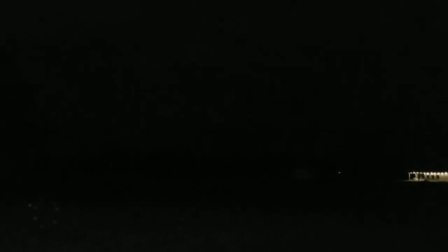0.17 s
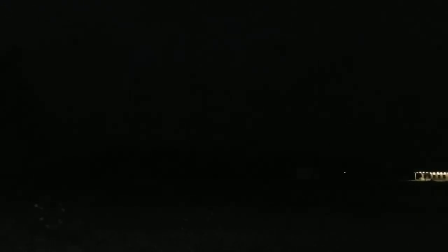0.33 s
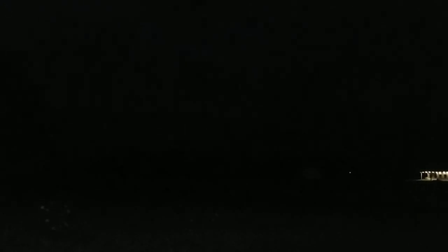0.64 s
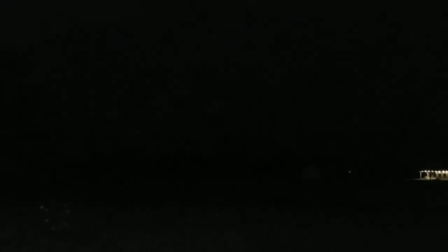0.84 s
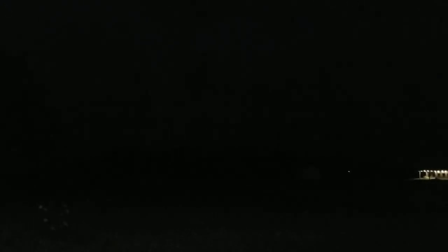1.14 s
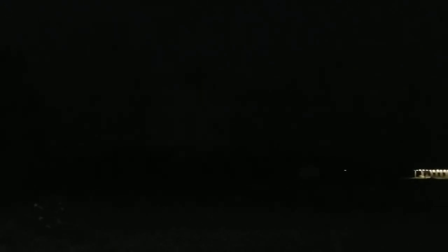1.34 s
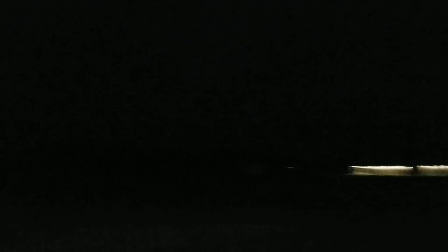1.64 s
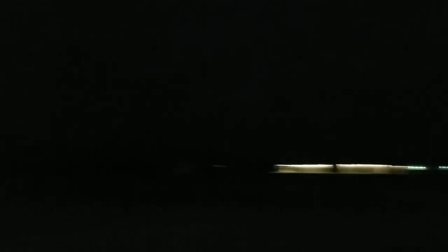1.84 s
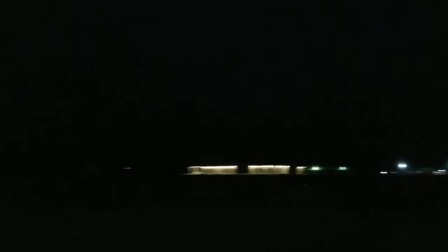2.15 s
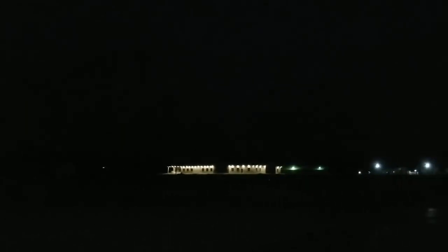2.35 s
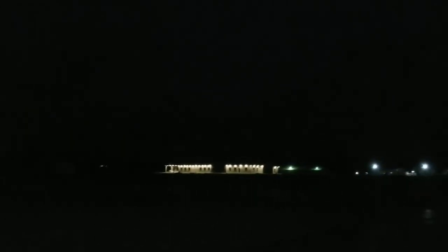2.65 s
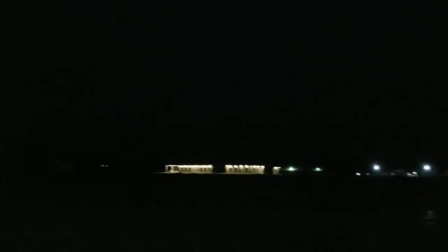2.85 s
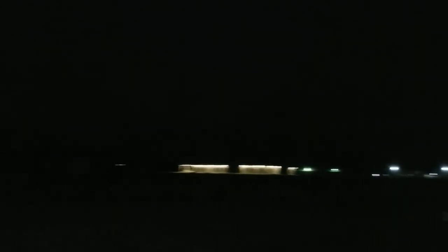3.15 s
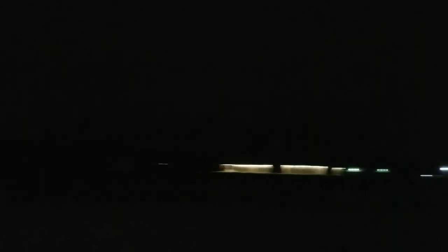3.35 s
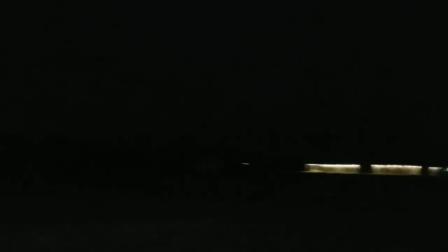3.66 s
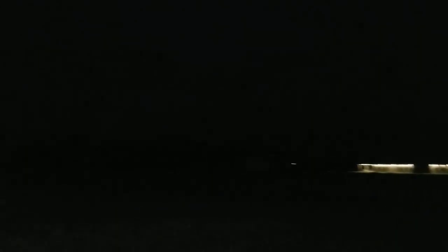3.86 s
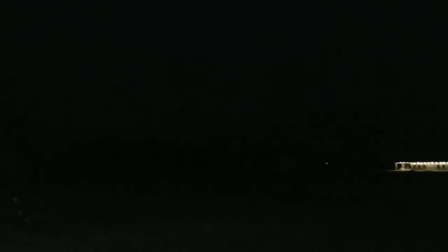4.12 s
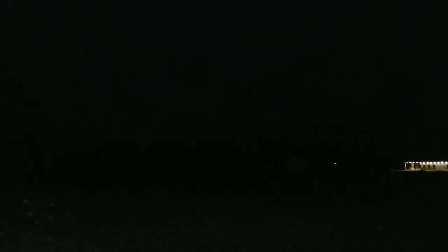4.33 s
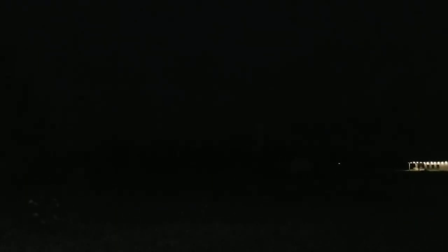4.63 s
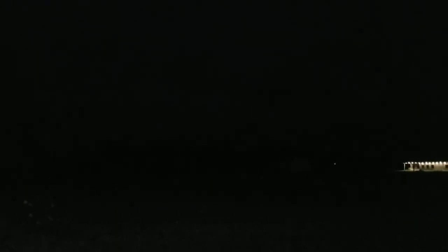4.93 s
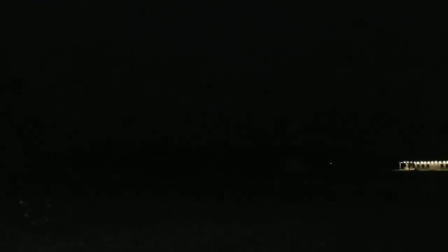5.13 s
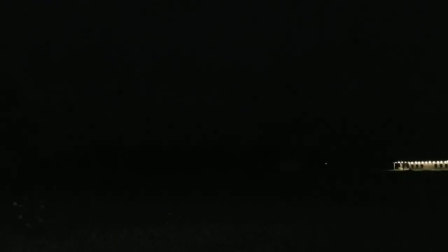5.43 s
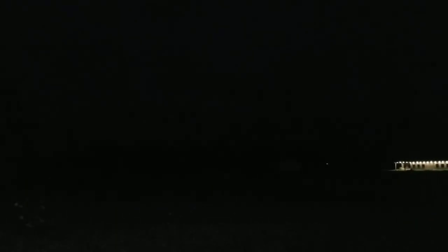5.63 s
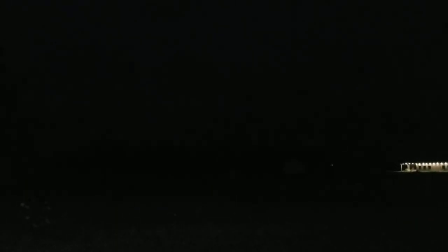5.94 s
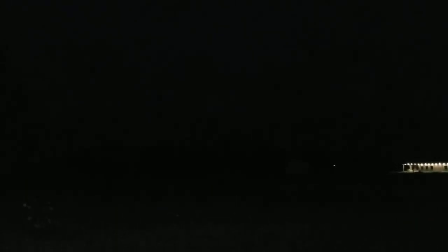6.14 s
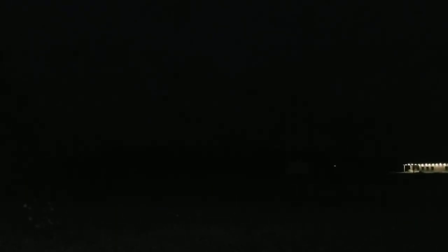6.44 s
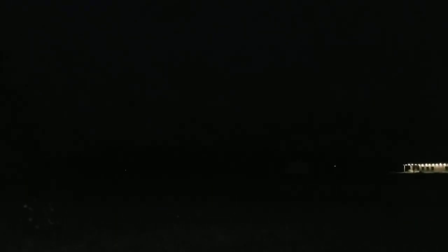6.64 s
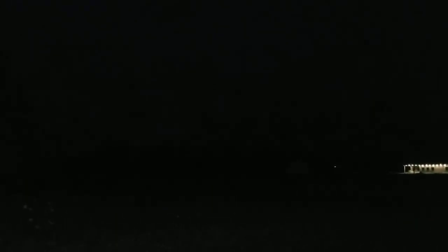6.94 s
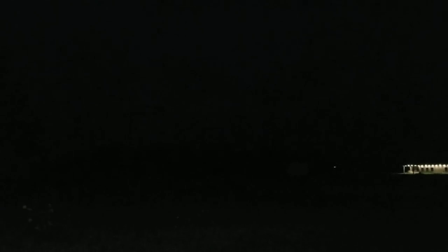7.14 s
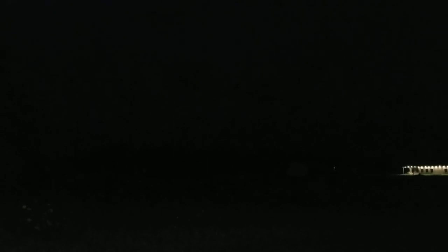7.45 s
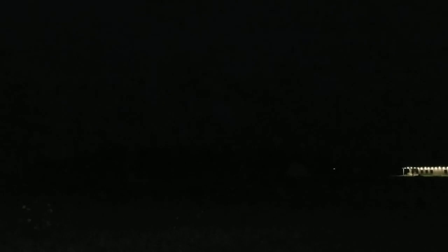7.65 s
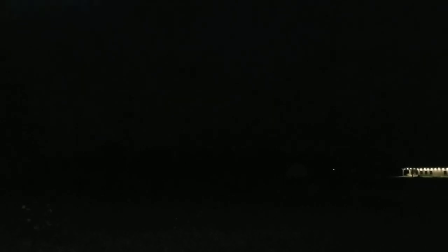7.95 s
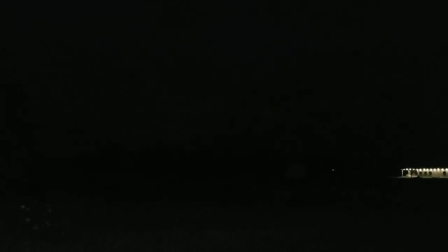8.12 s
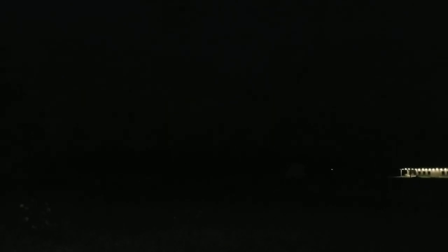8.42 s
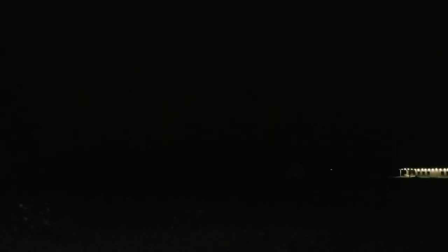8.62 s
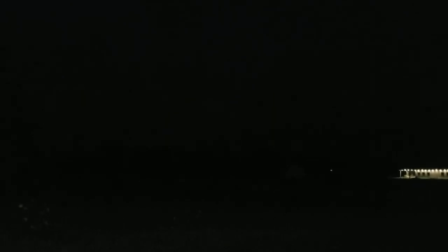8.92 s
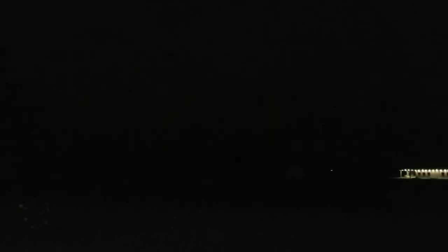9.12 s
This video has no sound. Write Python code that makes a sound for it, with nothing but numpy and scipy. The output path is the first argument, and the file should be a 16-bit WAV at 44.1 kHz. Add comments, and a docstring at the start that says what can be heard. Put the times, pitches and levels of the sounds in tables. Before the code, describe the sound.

Open field at night, heard in stereo on a hand-held recorder. A high, dry katydid buzz is already sounding and stops at 0.8 s, its echo quickly dying in the grass. Tree crickets hold a steady shimmer near 3 kHz with finer insect hiss above; a small cricket chirps on the left about every 0.4 s. Two low croaks overlap at 1.1 s. A short rasping lead-in at 1.5 s brings the chorus, joined by a louder, nearer katydid from 2 to 3.2 s; a faint toad trills at 2.4 s. Another lead-in at 4 s starts a buzz until 5.5 s, then a toad trill. The next phrase runs 6.3-7.8 s, with a soft distant boom at 7.0. In the pause, faint ticking grows from 7.9 to 8.6 s and one sharp tap knocks the left at 8.05. The buzz returns at 8.6 and continues, with another toad trill at 8.75. Low traffic rumble, blurred frogs and night air persist.

```python
"""Katydids on the right buzz in phrases timed together, one leading in, in an open field at night.
Each buzz is noise and sharp impulses, one stroke after another, coloured by the wings and echoed by plants.
Tone pulses make the tree crickets, far insects and a chirping cricket; shaped noise makes frogs, air and traffic.
A toad's trills ring a throat sac, other calls croak, two faint tones waver and a soft thud booms far off.
An insect ticks in noise bursts in the last pause, and one tap knocks the left port of the hand-held recorder."""
import sys
import numpy as np
from scipy import signal
from scipy.fft import rfft, irfft, next_fast_len
from scipy.io import wavfile
from scipy.ndimage import uniform_filter1d, map_coordinates

SR = 44100
rng = np.random.default_rng(int(sys.argv[2]) if len(sys.argv) > 2 else 0)


def pcm_store(signal):
    """Save signal as 16-bit PCM."""
    levels = np.round(np.clip(np.atleast_2d(signal), -1, 1) * 32767)
    wavfile.write(sys.argv[1], SR, levels.astype(np.int16).T)


N = 409248
T = np.arange(N) / SR  # time of each sample, s

# Katydid phrases, two lists each: (start t/s, attack t/s, end t/s), then
# (level/dB after the attack, level/dB at the end), both before echoes and port colouring.
BRIGHT_PHRASES = ([(-.1, .05, .785), (1.615, .04, 3.178), (4.04, .06, 5.537), (6.277, .04, 7.8),
                  (8.575, .03, 9.4)], [(-37, -37.5), (-38, -42), (-36.5, -36.5), (-37, -36),
                  (-37.5, -35.5)])
MELLOW_PHRASES = ([(-.1, .05, .785), (1.62, .07, 2.03), (4.06, .14, 5.53), (6.295, .08, 7.8),
                  (8.595, .045, 9.4)], [(-37, -38.5), (-42, -33), (-40, -39), (-39, -40), (-40.5, -41)])
# The mellow katydid, heard more directly with the recorder facing it, sings one phrase.
FACING_PHRASES = ([(1.96, .28, 3.178)], [(-30.5, -35.5)])
# The leader gives two short lead-ins, each before the others join.
LEADER_PHRASES = ([(1.526, .014, 1.63), (3.958, .008, 4.11)], [(-47.5, -46), (-49, -46)])
# When the phrases end, used to slow the wing strokes: t/s
PHRASE_ENDS = [.8, 3.19, 5.54, 7.81, 10.1]
# Wing colour of each katydid: f/Hz, relative level/dB per Hz
BRIGHT_WING = [(4000, -55), (7000, -34.5), (8000, -8), (9000, 0.5), (10500, 3), (11900, -1), (12500, -1),
               (13200, -7), (14000, -7), (15000, -13), (15600, -10.5), (15900, -7)]
MELLOW_WING = [(4120, -77), (7000, -29.5), (7500, -22), (8030, -18.5), (9420, 2.5), (9920, -3.5),
               (11300, -13.5), (12400, -30), (13500, -48)]
FACING_WING = [(4100, -58), (7000, -25), (7600, -6.5), (8300, -6), (8800, -0.5), (9500, 3), (10000, 3),
               (10600, -3), (11300, -4), (11900, -5), (12400, -17), (13000, -18), (13700, -29), (15700, -30)]
LEADER_WING = [(8000, -40), (9300, -6), (10000, -10), (10800, -6), (11400, -10), (12000, 4), (12600, -12),
               (14000, -16), (15700, -25)]
# When each pitch sounds within a stroke, as the scraper slows along the toothed file: f/Hz, delay/ms
STROKE_SWEEP = [(7000, 3.4), (7500, 3), (9000, 1.6), (10500, .3), (12000, 0), (16000, 1.5)]
# Sound paths off leaves and ground, one list for the left port and one for the right: delay/ms, gain
HEDGE_PATHS = ([(.27, .6), (2.46, .12), (3.46, .12)], [(0, 1), (.843, .25), (1.167, .22), (1.484, -.42),
               (1.863, .2), (2.487, .15)])
CLEARING_PATHS = ([(.28, .6), (.74, .5), (1.36, .2), (1.65, .2)], [(0, 1), (1.082, 0.11), (1.441, .17),
                  (2.192, 0.36), (2.673, 0.23)])
# How the recorder's body colours the left port: f/Hz, level/dB
BODY_SHADOW = [(7000, 3), (9500, -3.5), (11500, -2), (13000, -24), (16000, 4.5)]
# The same for the mellow katydid's direct sound, with the recorder facing it: f/Hz, level/dB
FACING_SHADOW = [(7000, -2), (7700, 3), (8300, -2.5), (9300, -17), (10200, -8), (10900, 1.5), (11800, -4),
                 (12400, -5), (13000, 6), (13600, -5), (16000, -9)]
# Tree crickets and far insects: centre f/Hz, spread f/Hz, mean pulses per s, pulse length/ms,
# level/dB before swells and drift, left over right/dB
CHORUSES = [(3132, 96.5, 1600, 15.4, -50, 2.5), (5800, 293, 3000, 6.1, -56, -0.5),
            (7916, 350, 2500, 4, -59, -2.5), (9990, 600, 1700, 3.2, -62, -8)]
# Slow swell of the tree crickets: t/s, added level/dB
TREE_CRICKET_SWELL = [(0, 0.5), (1.9, .5), (2.75, 4), (3.15, 0.5), (7.3, 0), (8.2, 1.5), (9.28, 1)]
# Colours of traffic, frogs, and night air with far insects: f/Hz, relative level/dB per Hz
RUMBLE_COLOUR = [(8.8, -35), (15, -38), (44, -3.5), (65, 5.5), (81, -2), (120, -6), (156, -14.5),
                 (300, -24.5), (390, -43), (660, -120)]
FROG_COLOUR = [(1600, -27.5), (1900, -3), (2250, -2.5), (2600, -2), (2900, -22)]
AIR_COLOUR = [(120, -2.5), (300, -8), (500, -12.5), (800, -7), (1100, -11.5), (1550, -17), (2500, -7.5),
              (3600, -17), (4600, -10.5), (6800, -11.5), (8800, -17.5), (11500, -14.5), (13200, -21.5),
              (16000, -44)]
# Loudness of the traffic and of the frog chorus: t/s, level/dB
RUMBLE_LEVEL = [(0, -52), (1.9, -49), (2.5, -52), (3.9, -51.5), (4.2, -57.5), (4.8, -53), (5.6, -55),
                (5.85, -49), (6.5, -50), (6.9, -48), (7.4, -50), (7.75, -54), (8.05, -49.5), (8.75, -55),
                (9, -49), (9.28, -51.5)]
FROG_LEVEL = [(0.0, -61.5), (1.11, -64), (1.27, -57), (1.96, -65.5), (2.35, -61.5), (3.93, -68.5),
              (4.44, -64), (4.99, -64), (5.22, -58.5), (6.54, -66), (6.9, -58), (7.68, -67.5),
              (8.19, -60.5), (9.28, -67.5)]
# How alike the two sides of the noise are: f/Hz, likeness (1 same, -1 opposite)
PORT_LIKENESS = [(60, 0.99), (150, 0.92), (380, 0.54), (950, -0.6), (2380, 0.41), (5980, -0.13),
                 (15000, 0.17)]
# Faint tones: centre f/Hz, middle level/dB
FAINT_TONES = [(372, -74.5), (581, -79.5)]
# When the small cricket on the left chirps: t/s
CHIRP_TIMES = [.16, .72, 1.16, 1.569, 2.021, 2.43, 2.85, 3.25, 3.66, 4.07, 4.51, 4.91, 5.31, 5.692, 6.1,
               6.51, 6.91, 7.32, 7.71, 8.09, 8.52, 8.93]
# Toad trills: start t/s, end t/s, first pulses per s, last pulses per s, relative level/dB
TOAD_TRILLS = [(2.345, 2.9, 27, 24, -68.5), (5.447, 6.02, 27.2, 23.6, -63), (8.75, 9.4, 27.2, 23.6, -63)]
# Resonances of the toad's throat sac: f/Hz, relative level/dB, time to fall 60 dB t/s
THROAT_SAC = [(1122, -16, .035), (1154, 3, 0.047), (2285, 5, 0.035)]
# Short low calls: start t/s, length t/s, f/Hz, middle level/dB at the right port
CROAKS = [(1.06, 0.084, 1040, -58), (1.1, 0.098, 1910, -52.5)]
# The ticking insect: start t/s, end t/s, ticks per s
TICKING = (7.89, 8.6, 48)
# Its wing colour: f/Hz, relative level/dB per Hz
TICK_WING = [(8500, -30), (10300, -1), (12000, 0), (14000, -3), (15800, -22)]
# The tap: t/s, level/dB
TAP = (8.0547, -18.5)
# Resonances of the recorder's shell: f/Hz, level/dB relative to the tap, time to fall 60 dB t/s
SHELL = [(880, -6.5, 0.01), (453, -13, 0.016)]

STOP_S = .02  # time the wings take to come to rest
CHIRP_DB = -52
THUD_S, THUD_HZ, THUD_DB, THUD_T60_S = 7.035, 72, -31.5, 0.55  # T60: time to fall 60 dB
TICK_DB = -59.5
TICK_DEPTH, RETURN_DEPTH = 0.72, .7  # how strongly the main and the doubled beat shape the ticks
TOP_HZ = 15830  # the recorder's band limit


def amp(db):
    """Turn dB into a gain."""
    return 10 ** (np.asarray(db) / 20)


def unit(x):
    """Scale a sound to an rms level of 1."""
    return x / np.sqrt(np.mean(x ** 2) + 1e-20)


def along(points, hz):
    """Read a curve of (Hz, value) points, joined by straight lines on a log pitch scale."""
    f, value = np.transpose(points)
    return np.interp(np.log(hz + 1), np.log(f + 1), value)


def curves(rows):
    """Draw each column after the time as a curve with one value per sample."""
    s, *columns = np.transpose(rows)
    return [np.interp(T, s, column) for column in columns]


def wobble(rate):
    """Draw a smooth random curve through `rate` random points a second."""
    return map_coordinates(rng.standard_normal(int(N * rate / SR) + 4), [T * rate])


def filtered(x, response):
    """Change the strength and timing of each frequency in a sound."""
    size = next_fast_len(N + 8192)
    spectrum = rfft(x, size) * response(np.fft.rfftfreq(size, 1 / SR))
    return irfft(spectrum, size)[..., :N]


def rush(colour, patchy_db):
    """Make coloured stereo noise of rms 1 whose loudness varies in random patches of time and pitch."""
    z = signal.stft(rng.standard_normal((2, N)), nperseg=512)[2]
    patches = uniform_filter1d(rng.standard_normal(z.shape[1:]), size=5, axis=0)
    patches = uniform_filter1d(patches, size=12, axis=1)
    pair = signal.istft(z * amp(patchy_db * unit(patches)), nperseg=512)[1][:, :N]

    def middle_and_side(hz):
        # more side sound makes the ports less alike
        turn = np.arccos(np.clip(along(PORT_LIKENESS, hz), -1, 1)) / 2
        return amp(along(colour, hz)) * [np.cos(turn), np.sin(turn)]

    middle, side = filtered(pair, middle_and_side)
    return unit(np.array([middle + side, middle - side]))


def ring(modes, size):
    """Add up the fading tones that one blow sets ringing."""
    t = T[:size]
    return sum(amp(db - 60 * t / t60) * np.sin(2 * np.pi * hz * t) for hz, db, t60 in modes)


def pulses(at_s, hz, ms, gain):
    """Place short soft tone pulses, each falling a little in pitch."""
    size = int(ms * SR / 1000)
    u = np.arange(size) / size  # 0 to 1 through the pulse
    cycles = hz[:, None] * (1 - 0.011 * u) * u * ms / 1000
    wave = np.sin(np.pi * u) * np.sin(2 * np.pi * cycles)
    index = (at_s[:, None] * SR).astype(int) + np.arange(size)
    return np.bincount(index.ravel(), (gain[:, None] * wave).ravel(), N + SR)[:N]


def phrasing(phrases, stop_db, fall_db_per_s):
    """Each phrase swells in, drifts to its last level, drops as the wings stop and echoes away."""
    effort = np.zeros(N)
    for (start, attack, end), (first_db, last_db) in zip(*phrases):
        times = [start + attack, end, end + STOP_S]
        level_db = np.interp(T, times, [first_db, last_db, last_db - stop_db])
        echo_fall_db = fall_db_per_s * np.clip(T - end, 0, 1)
        effort += np.clip((T - start) / attack, 0, 1) * amp(level_db - echo_fall_db)
    return effort


def katydid(effort, wing, strokes, depth, clean, paths, shadow, grass_db, grass_s):
    """A scraper rasps over a toothed file once per wing stroke; leaves, ground and grass return the buzz."""
    # strokes per second slow from the first rate to the second as each phrase tires
    to_end = np.array(PHRASE_ENDS)[np.searchsorted(PHRASE_ENDS, T - .3)] - T
    rate = np.interp(to_end, [0, 1.6], strokes[::-1])
    beat = np.cumsum(rate) / SR
    stroke = np.exp(depth * np.cos(2 * np.pi * beat) + 0.017 * wobble(60))

    # an even run over the teeth is one impulse a stroke, a little early or late and uneven in size
    at = np.flatnonzero(np.diff(np.floor(beat)))
    early, size = rng.standard_normal((2, 2000))[:, :len(at)]
    places = np.clip(at + np.round(0.7 * early).astype(int), 0, N - 1)
    runs = np.bincount(places, amp(0.5 * size), N)

    # the first noise is the rasp, with `clean` as the share of even runs; the others feed the grass echoes
    rasp = rng.standard_normal((3, N))
    rasp[0] = np.sqrt(1 - clean) * unit(stroke * rasp[0]) + np.sqrt(clean) * unit(runs)

    def wing_response(hz):
        # delays are shortest at 12 kHz, so pitch glides down below it and up above it
        turns = np.cumsum(along(STROKE_SWEEP, hz)) * hz[1] / 1000
        return amp(along(wing, hz)) * np.exp(-2j * np.pi * turns)

    buzz = filtered(rasp, wing_response)
    buzz /= buzz.std(axis=1, keepdims=True)

    def arrive(port, hz):
        return sum(gain * np.exp(-2j * np.pi * hz * ms / 1000) for ms, gain in port)

    direct = filtered(effort * buzz[0], lambda hz: np.array([arrive(port, hz) for port in paths]))
    # still stems nearby add a fine fixed pattern of short echoes, 16 dB down
    stems = rng.standard_normal((2, 512)) * amp(-60 * T[:512] / 0.013)
    stems *= amp(-16.0) / np.linalg.norm(stems, axis=1, keepdims=True)
    direct += signal.fftconvolve(direct, stems, axes=1)[:, :N]

    # swaying grass blurs the strokes, differs at the two ports and lingers
    step = 1 / (grass_s * SR)
    linger = signal.lfilter([step], [1, step - 1], effort ** 2)
    both = direct + amp(grass_db)[:, None] * np.sqrt(np.abs(linger)) * buzz[1:]
    return filtered(both, lambda hz: np.array([amp(along(shadow, hz)), 1 + 0 * hz]))


def choruses():
    """So many far trillers of each kind sound at once that their pulses merge into a shimmer."""
    out = np.zeros((2, N))
    swell_db, = curves(TREE_CRICKET_SWELL)
    for hz, spread_hz, rate, ms, db, pan_db in CHORUSES:
        gap, side = rng.random((2, 32000))
        tune, size = rng.standard_normal((2, 32000))
        at = np.cumsum(2 * gap / rate)
        keep = at < N / SR
        at, side = at[keep], side[keep]
        pitch = hz + spread_hz * np.clip(tune[keep], -2, 2)
        gain = amp(1.16 * size[keep])
        # pulses stronger on the left also start later there, by up to 1 ms
        left = unit(pulses(at + .001 * side, pitch, ms, gain * side))
        right = unit(pulses(at, pitch, ms, gain * (1 - side)))
        drift_db = swell_db * (hz < 4000) + .4 * wobble(5)  # only the lowest chorus, the tree crickets, swells
        out += amp(db + drift_db) * amp([[pan_db / 2], [-pan_db / 2]]) * np.array([left, right])
    return out


def distance():
    """Noise makes traffic rumble, a blurred frog chorus and night air; sines make two wavering tones."""
    (rumble_db,), (frogs_db,) = curves(RUMBLE_LEVEL), curves(FROG_LEVEL)
    rumble = amp(rumble_db) * rush(RUMBLE_COLOUR, patchy_db=0.5)
    # the frogs are 2 dB louder at the left port
    frogs = amp(frogs_db) * amp(0) * np.array([[1], [-1]]) * rush(FROG_COLOUR, patchy_db=1.5)
    frogs *= amp([[1], [-1]]) * [[1], [-1]]
    tones = np.zeros(N)
    for hz, db in FAINT_TONES:
        level = amp(db + 4 * wobble(3))
        tones += level * np.sin(2 * np.pi * np.cumsum(hz + 1.5 * wobble(6)) / SR)
    return rumble + frogs + tones + amp(-55) * rush(AIR_COLOUR, patchy_db=2.5)


def cricket(count=9):
    """Each chirp is a run of quick pulses that rise in pitch at first, louder on the left."""
    k = np.tile(np.arange(count), len(CHIRP_TIMES))  # place of each pulse in its chirp
    hz = 7540 - 200 * np.exp(-k / 0.78) + 30 * rng.standard_normal(len(k))
    at = np.repeat(CHIRP_TIMES, count) + .0115 * k
    chirps = pulses(at, hz, 9, amp(CHIRP_DB + 1.5 * rng.standard_normal(len(k))))
    return chirps * amp([[0], [-9]])


def toad():
    """Vocal pulses slowing through each trill ring the throat sac; short croaks are rough tones."""
    puffs, croaks = np.zeros(N), np.zeros(N)
    for start, end, first, last, db in TOAD_TRILLS:
        rate = np.interp(T, [start, end], [first, last]) * (T >= start) * (T < end)
        beat = np.cumsum(rate) / SR
        at = np.flatnonzero(np.diff(np.floor(beat + .99), prepend=0))
        puffs[at] = amp(db + 18 + 1.6 * rng.standard_normal(40)[:len(at)])
    voice = ring(THROAT_SAC, size=2200) * (1 - np.exp(-(T[:2200] / 0.0069) ** 2))  # soft start
    for s, length, hz, db in CROAKS:
        shape = np.sin(np.pi * np.clip((T - s) / length, 0, 1))
        croaks += amp(db + 2 * wobble(82.5)) * shape * np.sin(2 * np.pi * hz * T)
    calls = signal.fftconvolve(puffs, voice)[:N] + croaks
    # the left port hears it 14 samples later and softer
    return np.array([amp(-4.5) * np.roll(calls, 14), calls])


def thud():
    """A far soft boom is one low tone that swells quickly and fades, alike at both ports."""
    t = np.clip(T - THUD_S, 0, None)
    rise = 1 - np.exp(-t / 0.0098)
    return amp(THUD_DB - 60 * t / THUD_T60_S) * rise * np.sin(2 * np.pi * THUD_HZ * t)


def ticker():
    """Short even bursts of wing noise creep in, louder on the right."""
    start, end, rate = TICKING
    beat = 2 * np.pi * rate * (T - start)
    # the wings also sound on the way back
    gate = np.exp(TICK_DEPTH * np.cos(beat) + RETURN_DEPTH * np.cos(2 * beat))
    noise = gate * rng.standard_normal((2, N))
    bursts = unit(filtered(noise, lambda hz: amp(along(TICK_WING, hz))))
    fade_in = np.clip((T - start) / .15, 0, 1)
    return amp(TICK_DB) * fade_in * (T < end) * bursts * amp([[-5], [0]])


def tap():
    """One knock by the left port gives a brief tick in the port's cavity, then the shell rings low."""
    at_s, db = TAP
    out = np.exp(-((T - at_s) / 0.00039) ** 2) * np.cos(2 * np.pi * 2800 * (T - at_s))
    shell = ring(SHELL, size=800) * (1 - np.exp(-T[:800] / .001))
    out[round(at_s * SR) + 22:][:800] -= shell
    return amp(db) * out * amp([[0], [-24]])


def scene():
    """Add up everything that reaches the two ports."""
    bright = katydid(
        phrasing(BRIGHT_PHRASES, stop_db=8, fall_db_per_s=140), BRIGHT_WING,
        strokes=[186, 173], depth=0.17, clean=0.2,
        paths=HEDGE_PATHS, shadow=BODY_SHADOW, grass_db=[-3, -14], grass_s=0.027)
    mellow = katydid(
        phrasing(MELLOW_PHRASES, stop_db=0.5, fall_db_per_s=146), MELLOW_WING,
        strokes=[183, 170], depth=0.35, clean=0.25,
        paths=HEDGE_PATHS, shadow=BODY_SHADOW, grass_db=[-3, -14], grass_s=0.028)
    facing = katydid(
        phrasing(FACING_PHRASES, stop_db=5.5, fall_db_per_s=116), FACING_WING,
        strokes=[182, 176], depth=0.25, clean=.62,
        paths=CLEARING_PATHS, shadow=FACING_SHADOW, grass_db=[-9, -10], grass_s=0.01)
    leader = katydid(
        phrasing(LEADER_PHRASES, stop_db=1.5, fall_db_per_s=200), LEADER_WING,
        strokes=[182, 175], depth=2.5, clean=.45,
        paths=CLEARING_PATHS, shadow=BODY_SHADOW, grass_db=[-8, -10], grass_s=0.0098)
    katydids = bright + mellow + facing + leader
    return katydids + choruses() + cricket() + toad() + distance() + thud() + tap() + ticker()


def record(dry):
    """The recorder keeps nothing above its band limit."""
    return filtered(dry, lambda hz: np.clip((TOP_HZ - hz) / 120, 0, 1))


dry = scene()
out = record(dry)
pcm_store(out)
```